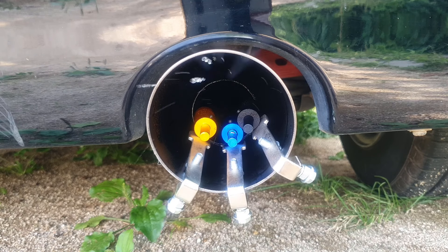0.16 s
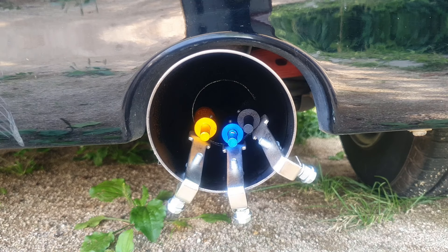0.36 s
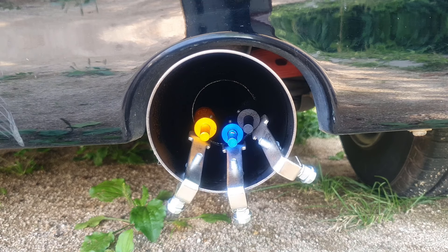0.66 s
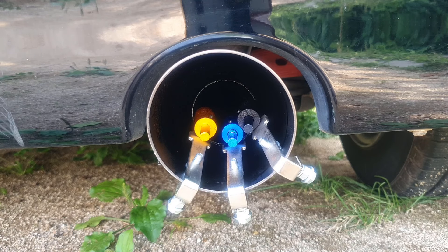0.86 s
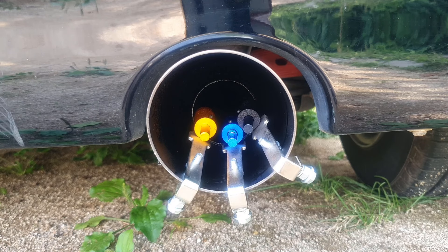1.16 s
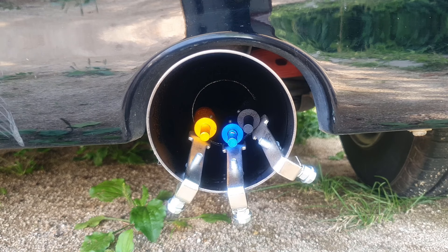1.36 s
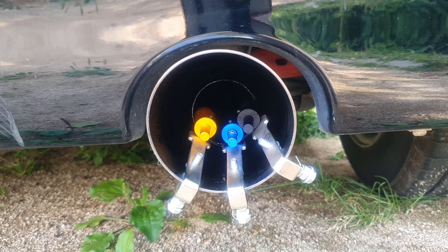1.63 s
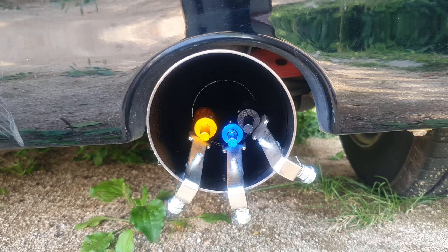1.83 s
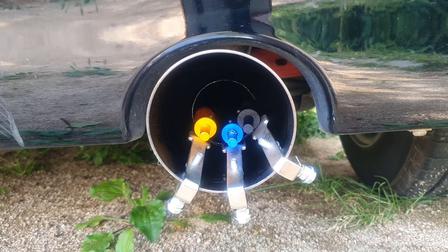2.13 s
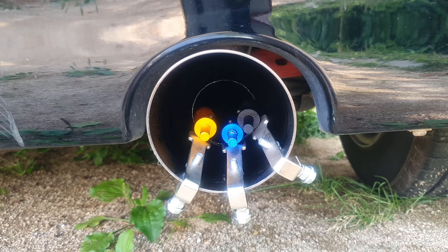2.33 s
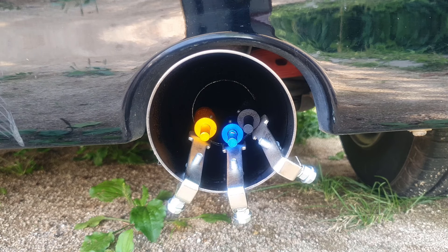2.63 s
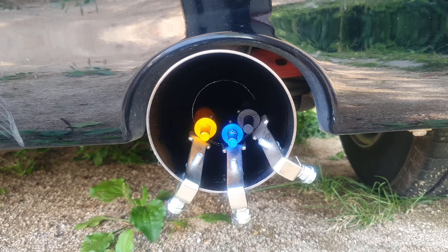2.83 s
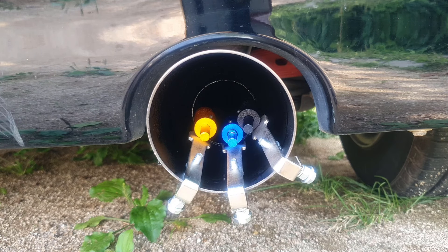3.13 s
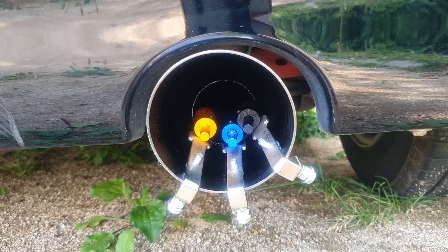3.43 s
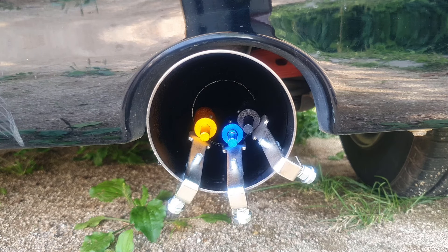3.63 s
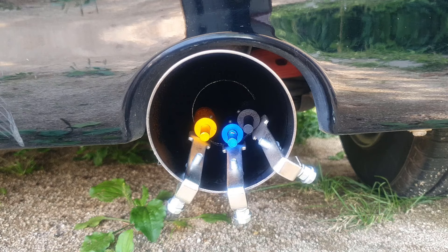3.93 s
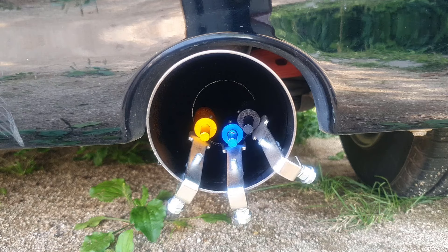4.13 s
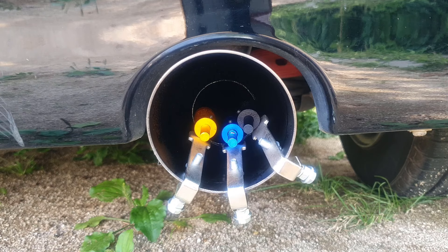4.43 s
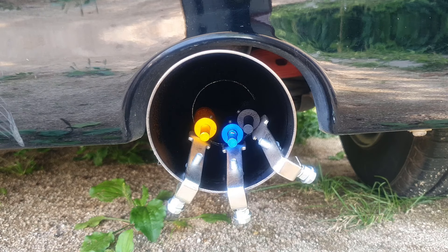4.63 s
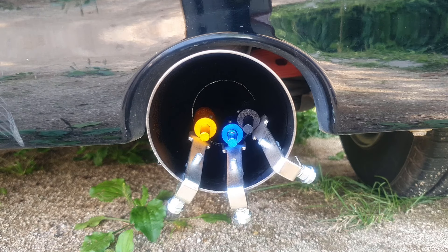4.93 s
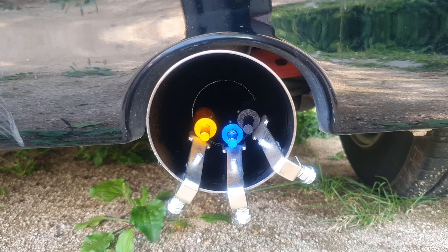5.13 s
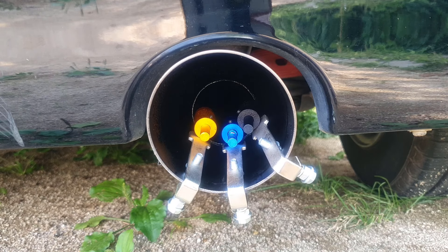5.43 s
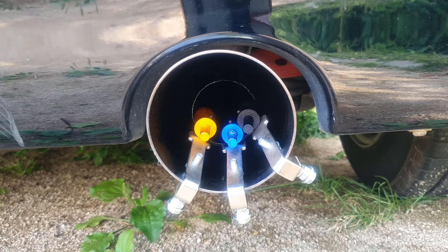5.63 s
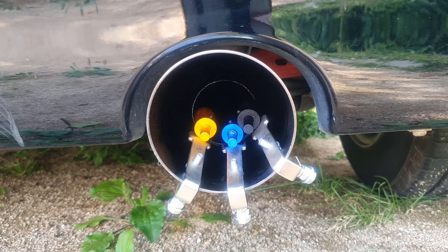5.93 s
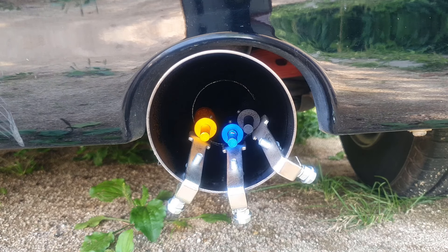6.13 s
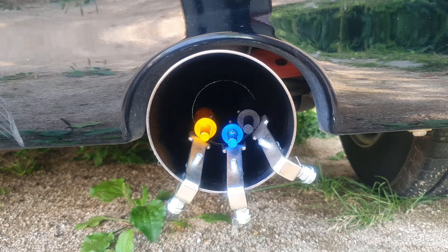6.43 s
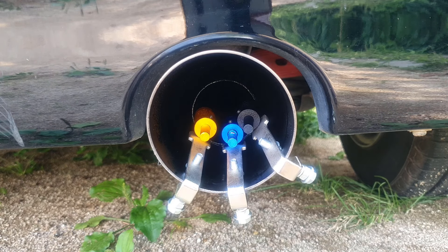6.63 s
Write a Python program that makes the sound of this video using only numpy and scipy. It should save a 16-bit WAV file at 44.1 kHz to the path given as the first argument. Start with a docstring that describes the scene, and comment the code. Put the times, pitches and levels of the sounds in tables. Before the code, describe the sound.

Close stereo sound outdoors behind a parked four-cylinder car with whistle inserts clipped into its tailpipe. It starts on a low exhaust hum just above idle; at about 0.1 s the throttle closes with two quick light metallic knocks, and the clips sizzle faintly until about 0.7 s. The note sinks, soft and slightly uneven, to a slow idle by 1.6-2 s. Around 2.4 s the engine's hiss grows, with tiny chirps at 2.4-2.5 s and another at 3.4 s, over fine valve ticking and a faint steady whine. From about 3.4 s the revs rise, with a short clip buzz near 3.9 s. The boom climbs in pitch and swells strongly around 5.1 s, with a hard breathy rush of gas and another brief buzz. Toward 5.5-6 s a thin whistle enters, strongest just before 6 s, then weakens. The engine drones high and raspy, with bright airy hiss and more clip buzz around 6.6 s, still rising at the end.

```python
"""Close behind a parked four-cylinder car, with a two-port microphone near its tailpipe.
The revs sink to idle, then climb to about 3200 a minute. Summed harmonics of the firings boom and ring the exhaust.
Coloured noise makes the gas rushing past whistle inserts clipped to the pipe's rim; filtered noise bursts make
their metal clips sizzle, and a harmonic starts to whistle at the top.
The running engine hisses, ticks, whines and chirps behind."""
import sys
import numpy as np
from scipy import signal
from scipy.fft import rfft, irfft
from scipy.io import wavfile

SR = 44100
rng = np.random.default_rng(int(sys.argv[2]) if len(sys.argv) > 2 else 0)


def log_audio(samples):
    """Write samples as a 16-bit WAV file to the path given in sys.argv[1]."""
    # one column per channel
    frames = np.atleast_2d(samples).T
    # limit to full scale, then quantise
    limited = np.clip(frames, -1, 1)
    pcm = np.round(limited * 32767).astype(np.int16)
    wavfile.write(sys.argv[1], SR, pcm)


N = 298557
TIME = np.arange(N) / SR  # s
BINS = np.maximum(np.arange(N // 2 + 1) * SR / N, 1)  # Hz, kept above zero


def undb(db):
    """Decibels to gain."""
    return 10 ** (np.asarray(db) / 20)


def curves(table):
    """The columns of a table, joined by straight lines in time."""
    seconds, *columns = np.transpose(table)
    return [np.interp(TIME, seconds, column) for column in columns]


def unit(x):
    """Scale to rms 1."""
    return x / np.sqrt(np.mean(np.abs(x) ** 2))


def walk(rate_hz):
    """Smooth random drift with a spread of 1, weakening above the given rate."""
    spectrum = rfft(rng.standard_normal(N))
    return unit(irfft(spectrum / (1 + (BINS / rate_hz) ** 4), N))


def swell(start, hold, rise, decay):
    """An envelope that grows exponentially, holds and dies away; all in seconds."""
    early = (start - TIME) / rise
    late = (TIME - start - hold) / decay
    return np.exp(-np.maximum(np.maximum(early, late), 0))


def level_at(points, hz):
    """Read a spectrum of (Hz, dB) points at some frequencies, along a log frequency axis."""
    at, db = np.transpose(points)
    return np.interp(np.log(hz), np.log(at), db)


def colour(points):
    """Gain at each frequency from (Hz, dB) points."""
    return undb(level_at(points, BINS))


def resonances(hz, modes):
    """Complex response of a set of resonances, each with steep skirts."""
    response = 0
    for centre, width, db in modes:
        detuning = centre / width * (hz / centre - centre / hz)
        response = response + undb(db) / (1 + .5j * detuning) ** 2
    return response


def ringing(gain):
    """Give a gain curve the phase of a body that rings after the blow, never before."""
    cepstrum = irfft(np.log(gain), N)
    cepstrum[1:] *= 2 * (np.arange(1, N) < N / 2)  # fold onto positive times: minimum phase
    return np.exp(rfft(cepstrum))


def shape(x, response):
    """Filter by a response and scale to rms 1."""
    return unit(irfft(rfft(x) * response, N))


def noise(likeness):
    """White noise at two ports that share a part of it (0 to 1 of the power)."""
    shared = np.sqrt(likeness) * rng.standard_normal(N)
    return shared + np.sqrt(1 - likeness) * rng.standard_normal((2, N))


def place(x, left_db):
    """Make the left port louder than the right by left_db."""
    return x * undb(np.array([[left_db], [-left_db]]) / 2)


def puffs(turns, depth):
    """A swell once per firing; turns counts the firings."""
    return unit(np.exp(depth * np.cos(2 * np.pi * turns)))


# How the exhaust system carries the three lowest harmonics.
# Each row: frequency in Hz, gain in dB.
BOOM_RESPONSE = [(31, -16.5), (41, -2.5), (50, -10.5), (72, -6.5), (82, -12.5), (105, -14.5), (125, -16.5),
                 (157, -16.5), (200, -33.5), (255, -42.5), (320, -26)]
# The three lowest harmonics, first to third.
# Each row: level in dB before the exhaust's response and load, gain in dB per dB of load.
LOW_HARMONICS = [(1, 0.72), (1.2, 0.925), (-0.5, 1.12)]


def harmonic_levels(hz, load_db):
    """The lowest harmonics grow with load and swell as they cross the exhaust's resonances."""
    return [level_at(BOOM_RESPONSE, k * hz) + db + per_load * load_db
            for k, (db, per_load) in enumerate(LOW_HARMONICS, 1)]


def boom(turns, levels_db, flutter_db, lope, smear=0.27):
    """The three lowest harmonics of the firings, spread out by the silencer; unequal cylinders make them lope."""
    tone = 0
    for k, db in enumerate(levels_db, 1):
        level = undb(db + flutter_db * walk(5.6))
        tone = tone + level * np.cos(2 * np.pi * k * turns - smear * k ** 2)
    return np.sqrt(2) * tone * (1 + lope * np.cos(np.pi * turns))  # every other firing is stronger


# What the exhaust system lets through to the open end of the pipe.
# Each row: frequency in Hz, gain in dB.
PIPE_RESPONSE = [(110, 9), (160, 13), (183, -13), (215, -15), (252, -3), (285, -10), (320, -5), (412, 4),
                 (465, -16), (530, -24), (635, -12), (690, -28), (850, -31), (1100, -44)]
# How fast the harmonics weaken above the knee; idle firings are rounder, so duller.
# Each row: firing rate in Hz, fall in dB per octave.
RASP_FALL = [(33.5, 19.5), (42, 12)]
RASP_KNEE_ORDER = 8.67  # harmonic number that is strongest before the pipe
RASP_RISE_DB_PER_OCTAVE = 3.5  # growth up to the knee
PIPE_LAG_S = .02  # the pipe's resonances take this long to build up


def rasp(hz, turns, uneven_db, scatter_db, jitter, smear=.3, count=32):
    """Higher harmonics sweep through the pipe's resonances, with weak lines half way between them."""
    turns = turns + jitter * walk(21)
    pipe = ringing(colour(PIPE_RESPONSE))
    fall_db = np.interp(hz, *np.transpose(RASP_FALL))
    lagged_hz = np.interp(TIME - PIPE_LAG_S, TIME, hz)
    uneven = undb(uneven_db)
    tone = 0
    for k in 3.5 + np.arange(count) / 2:
        octaves = np.log2(k / RASP_KNEE_ORDER)
        slope_db = RASP_RISE_DB_PER_OCTAVE * min(octaves, 0) - fall_db * max(octaves, 0)
        gain = np.interp(k * lagged_hz, BINS, pipe) * undb(slope_db)
        if k % 1:
            gain = gain * uneven
        gain = gain * np.exp(-1j * smear * k ** 2)  # the silencer's chambers spread each pulse out
        tone = tone + np.real(gain * np.exp(2j * np.pi * k * turns))
    return np.sqrt(2) * tone * undb(scatter_db * walk(68))


# The colour of the turbulence in the pipe.
# Each row: frequency in Hz, relative level in dB.
RUMBLE_COLOUR = [(20, -22), (50, 5), (105, 1), (152, 6), (200, -11), (250, -2), (285, -10), (360, -6),
                 (412, 0), (490, -15), (620, -9), (720, -18), (1200, -32), (3000, -70)]
RUMBLE_DB, RUMBLE_PER_LOAD = -27.5, .66  # level at full load (0 dB); dB per dB of load
RASP_DB, RASP_PER_LOAD = -20, 1.224  # at full load, before the pipe; dB per dB: nearly gone off throttle


def exhaust(hz, turns, load_db, low_db):
    """The exhaust note, and turbulence that rumbles in the same pipe; both grow with load."""
    low_note = boom(turns, low_db, flutter_db=-0.22, lope=0.026)
    uneven_db = np.interp(hz, [33, 45], [-13, -22])  # the cylinders are least alike at idle
    high_note = rasp(hz, turns, uneven_db, scatter_db=.6, jitter=.0015)
    note = low_note + undb(RASP_DB + RASP_PER_LOAD * load_db) * high_note
    rumble = shape(noise(0.84) * puffs(turns, depth=0.057), colour(RUMBLE_COLOUR))
    rumble = undb(RUMBLE_DB + RUMBLE_PER_LOAD * load_db) * rumble
    return place(note + rumble, left_db=1.5)


# The colour of the gas leaving the pipe.
# Each row: frequency in Hz, relative level in dB.
GAS_COLOUR = [(500, -2), (1000, -24.5), (1170, 6), (1290, 8.5), (1360, 6.5), (1510, 3.5), (1710, 12.5),
              (1850, -5.5), (2100, -8), (3500, -38.5), (7000, -45.5), (15000, -46)]
GAS_DB = -41.5  # relative to the first harmonic that pumps it, away from the surges
SURGE_HZ, SURGE_WIDTH_HZ, SURGE_DB = 80.38, 13, 9.5  # resonance that makes the gas rush harder
SECOND_SURGE_SHARE = 0.2  # of the surge in dB, as the second harmonic crosses it


def gas_rush(hz, turns, pulse_db):
    """Gas puffs from the pipe with each firing, harder as the firings cross a resonance."""
    first = np.exp(-((hz - SURGE_HZ) / SURGE_WIDTH_HZ) ** 2)
    second = np.exp(-((2 * hz - SURGE_HZ) / SURGE_WIDTH_HZ) ** 2)
    level_db = GAS_DB + pulse_db + SURGE_DB * (first + SECOND_SURGE_SHARE * second)
    gas = shape(noise(0.86) * puffs(turns, depth=0.14), colour(GAS_COLOUR))
    return place(undb(level_db) * gas, left_db=4.5)


# The colour of the jet past the inserts.
# Each row: frequency in Hz, relative level in dB.
JET_COLOUR = [(1500, 0.5), (3000, 0.5), (5500, -21.5), (6280, -7), (7400, -8), (9000, 0), (11500, -2.5),
              (13000, 2), (15500, 1)]


def jet(hz, turns):
    """A jet of gas past the inserts grows steeply with engine speed."""
    level_db = -52.0 + 89 * np.log10(hz / hz.max())  # -52 dB at the highest revs
    hiss = shape(noise(.2) * puffs(turns, depth=.3), colour(JET_COLOUR))
    return place(undb(level_db) * hiss, left_db=-9.5)


WHISTLE_HZ, WHISTLE_WIDTH_HZ, WHISTLE_DB = 947.7, 16.6, -39.5  # insert's resonance; level fully driven
WHISTLE_ONSET_HZ, WHISTLE_FULL_HZ = 90, 96.85  # firing rates between which the flow starts to sound it


def whistle(hz, turns, waver_db, side_db, order=9):
    """A high-rev tone locks to the ninth harmonic, swelling near the insert's resonance; firings add neighbours."""
    flow = np.clip((hz - WHISTLE_ONSET_HZ) / (WHISTLE_FULL_HZ - WHISTLE_ONSET_HZ), 0, 1)
    in_tune = 1 / np.hypot(1, 2 * (order * hz - WHISTLE_HZ) / WHISTLE_WIDTH_HZ)
    phase = 2 * np.pi * order * turns + .1 * walk(25)
    throb = 1 + 2 * undb(side_db) * (np.cos(2 * np.pi * turns) + np.cos(4 * np.pi * turns))
    level = undb(WHISTLE_DB + waver_db * walk(24)) * flow * in_tune
    return place(np.sqrt(2) * level * throb * np.sin(phase), left_db=6)


# The ring of the metal clips.
# Each row: frequency in Hz, width in Hz, relative level in dB.
CLIP_MODES = [(1380, 70, -4), (5000, 120, -2), (6270, 130, 2), (8220, 130, -3), (8905, 70, 6),
              (9430, 170, 0), (10370, 90, -2), (11300, 170, -5), (12080, 60, 6), (12480, 200, -1),
              (13150, 200, -3), (14000, 130, -7), (14950, 200, -7)]
# Fits of buzzing of the clips.
# Each row: start in seconds, length in seconds, level in dB.
BUZZ_FITS = [(0, .1, -58.5), (0.302, .33, -52), (3.869, .12, -49.5), (5.116, 0.038, -51), (6.55, .22, -55)]
BUZZ_ATTACK_S, BUZZ_RELEASE_S = 0.039, 0.059
TREMBLE_DB = -52  # the clips' faint buzz in between, relative to the first harmonic


def clip_buzz(turns, pulse_db, fizz=0.18):
    """The clips chatter on the rim in uneven bursts, once per firing: ringing modes over a broad fizz."""
    fits = sum(undb(db) * swell(start, length, BUZZ_ATTACK_S, BUZZ_RELEASE_S)
               for start, length, db in BUZZ_FITS)
    bursts = puffs(turns, depth=.35) * undb(1.5 * walk(45) + 2 * walk(900))
    ring = shape(noise(.15) * bursts, np.abs(resonances(BINS, CLIP_MODES)) + fizz)
    return np.hypot(fits, undb(TREMBLE_DB + pulse_db)) * ring


# Two knocks as the throttle closes.
# Each row: time in seconds, envelope peak in dB.
KNOCKS = [(0.093, -40.5), (.117, -41)]
# What the knocks ring with.
# Each row: frequency in Hz, width in Hz, relative level in dB.
KNOCK_MODES = [(1770, 530, 1), (4860, 580, 3)]


def knocks():
    """Light metallic knocks as the load drops away: short blows of noise through two resonances."""
    blows = sum(undb(db) * swell(start, 0, rise=0.0011, decay=0.0053) for start, db in KNOCKS)
    return place(blows * shape(noise(.23), resonances(BINS, KNOCK_MODES)), left_db=4.0)


# Short chirps from the running engine.
# Each row: time in seconds, envelope peak in dB, pitch in Hz, decay in seconds.
CHIRPS = [(2.372, -49, 5236, 0.013), (2.428, -51, 5310, 0.0078), (2.475, -37, 3840, 0.021),
          (3.432, -37.5, 3840, 0.018)]


def chirps():
    """Brief narrow squeaks of resonant noise that swell and die away."""
    out = np.zeros((2, N))
    for start, db, pitch_hz, decay in CHIRPS:
        squeak = shape(noise(0.33), resonances(BINS, [(pitch_hz, 440, 0)]))  # 440 Hz wide
        out += undb(db) * swell(start, 0, 0.007, decay) * squeak
    return place(out, left_db=7.5)


# The colour of the engine's hiss before the body rings with it.
# Each row: frequency in Hz, relative level in dB.
HISS_COLOUR = [(400, 0.5), (600, 5.5), (800, 5.5), (1100, 6), (1350, -1.5), (1600, -2), (2100, 1.5),
               (2750, 5), (3600, 1.5), (4800, -1.5), (6500, -4), (7600, -12.5), (11000, -15), (15500, -20)]
# Narrow resonances of the car's body.
# Each row: frequency in Hz, width in Hz, level in dB.
BODY_MODES = [(1022, 40, -1.5), (1458, 9, 11), (1893, 48, 5.5), (2450, 33, -9), (3400, 39, -8.5),
              (3676, 26, 2), (6290, 62, 0.5)]


def engine_hiss(turns, hiss_db):
    """The engine hisses through the body's resonances, pulsing twice per firing."""
    body = 1 + np.abs(resonances(BINS, BODY_MODES))
    hiss = shape(noise(0.21) * puffs(2 * turns, depth=0.056), colour(HISS_COLOUR) * body)
    return place(undb(hiss_db + .5 * walk(20)) * hiss, left_db=3.5)


WHINE_DB = -14  # relative to the hiss, before the fade
WHINE_FADE_HZ, WHINE_FADE_DB_PER_HZ = 36, 0.8  # it fades above this firing rate


def whine(firing_hz, hiss_db, hz):
    """A faint steady tone that swells with the hiss at idle and fades as the revs rise."""
    phase = 2 * np.pi * hz * TIME + .6 * walk(4.9)
    fade_db = WHINE_FADE_DB_PER_HZ * np.maximum(firing_hz - WHINE_FADE_HZ, 0)
    level = undb(WHINE_DB + hiss_db - fade_db + 2 * walk(4.5))
    return place(np.sqrt(2) * level * np.sin(phase), left_db=-3.5)


TICK_DB, TICK_PER_LOAD = -59, 0.46  # level at full load; dB per dB of load


def valve_tick(turns, load_db, hz, width_hz, scatter_db):
    """One valve ticks every fourth firing, with a random strength each time."""
    cycle = (turns - np.interp(4.296, TIME, turns)) / 4  # one tick falls at 4.296 s
    index = np.floor(cycle).astype(int)
    strengths = np.clip(rng.standard_normal(np.ptp(index) + 1), -2, 1)
    size_db = scatter_db * strengths[index - index.min()]
    blows = np.exp(-(cycle % 1) / 0.14) * undb(size_db)  # decay as a share of the cycle
    tick = shape(noise(0.32) * blows, resonances(BINS, [(hz, width_hz, 0)]))
    return place(undb(TICK_DB + TICK_PER_LOAD * load_db) * tick, left_db=5)


# The engine's speed and load; four cylinders fire twice a revolution.
# Each row: time in seconds, firing rate in Hz, load in dB.
ENGINE = [(0, 45.15, -16.5), (0.085, 43.4, -15), (0.12, 40.78, -27), (0.4, 41.6, -27.5), (0.8, 37.39, -28),
          (1.6, 31.17, -28), (2, 30.7, -25), (2.4, 32.69, -17.5), (3.33, 33.06, -15.5), (3.58, 36.8, -11.0),
          (3.8, 41.39, -15), (4.1, 49.89, -9.5), (4.68, 64.13, -9.5), (5.15, 82.07, -2), (5.45, 90.1, -4.5),
          (5.85, 97.95, -7), (6.45, 104.3, -6.5), (6.77, 105.9, -2.2)]
# How loud the engine hisses.
# Each row: time in seconds, level in dB.
HISS_LEVEL = [(0, -57), (1, -59.5), (2, -55.5), (2.4, -46), (3.3, -47), (3.85, -51), (4.8, -48), (5.5, -41),
              (6.3, -39.5), (6.77, -35.5)]


def scene():
    """One crankshaft drives the firings; its speed and load set most of the levels."""
    hz, load_db = curves(ENGINE)
    hiss_db, = curves(HISS_LEVEL)
    turns = np.cumsum(hz) / SR  # firings so far
    low_db = harmonic_levels(hz, load_db)
    pulse_db = low_db[0]  # the first harmonic pumps the gas and shakes the clips
    pipe = exhaust(hz, turns, load_db, low_db)
    air = gas_rush(hz, turns, pulse_db) + jet(hz, turns) + engine_hiss(turns, hiss_db)
    tones = whistle(hz, turns, waver_db=.6, side_db=-14) + whine(hz, hiss_db, hz=872)
    ticks = valve_tick(turns, load_db, hz=3650, width_hz=220, scatter_db=3)
    rattles = clip_buzz(turns, pulse_db) + knocks() + chirps() + ticks
    return pipe + air + tones + rattles


TOP_HZ = 15750


def record(dry):
    """The sound reaches the microphone's right port 55 microseconds later; the top is cut off."""
    right = np.interp(TIME - 5.5e-5, TIME, dry[1])
    ports = np.array([dry[0], right])
    low_pass = signal.ellip(10, .2, 80, TOP_HZ, fs=SR, output="sos")
    return signal.sosfilt(low_pass, ports)


dry = scene()
out = record(dry)
log_audio(out)
```